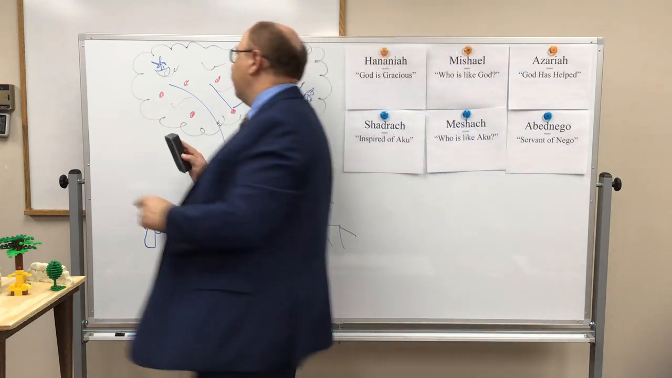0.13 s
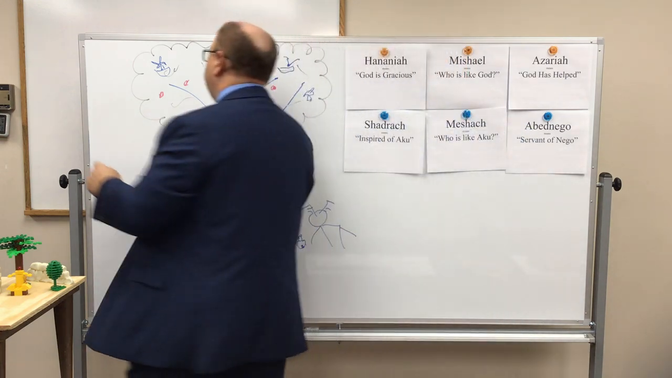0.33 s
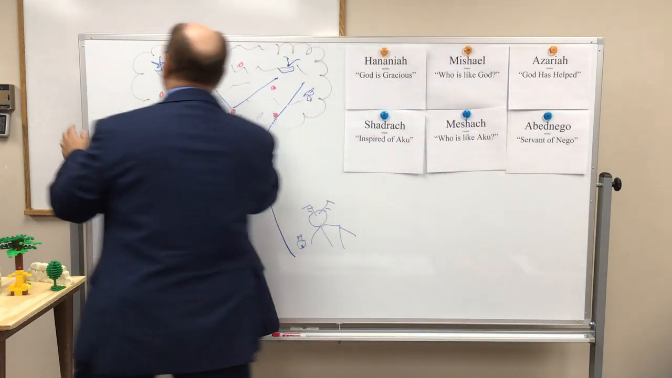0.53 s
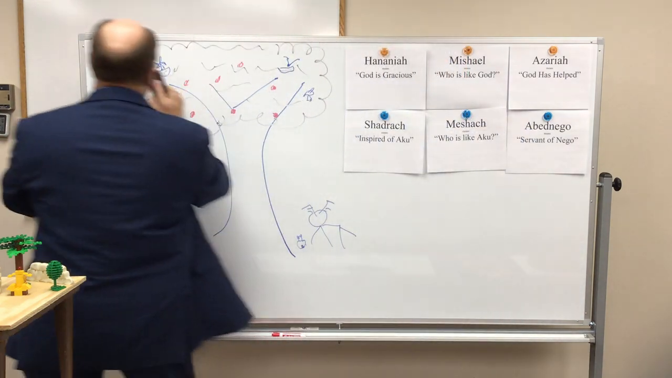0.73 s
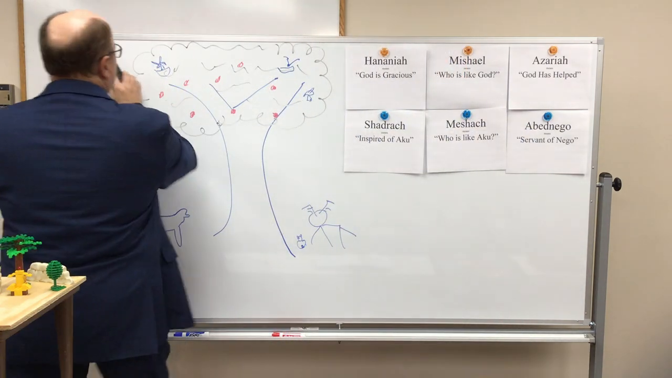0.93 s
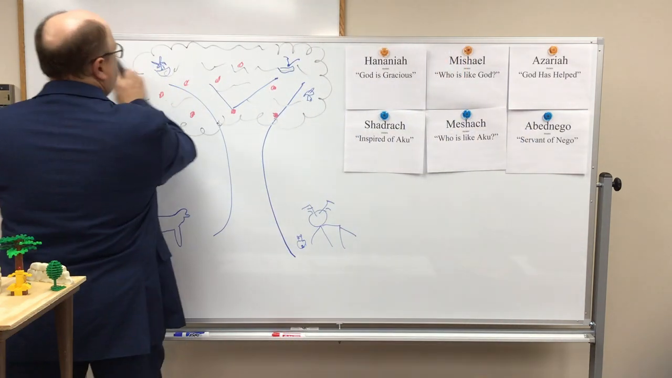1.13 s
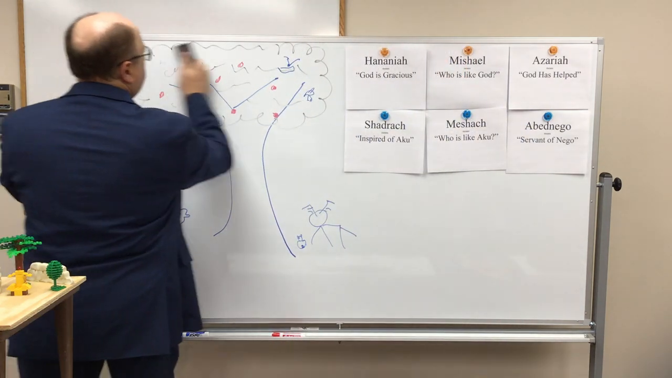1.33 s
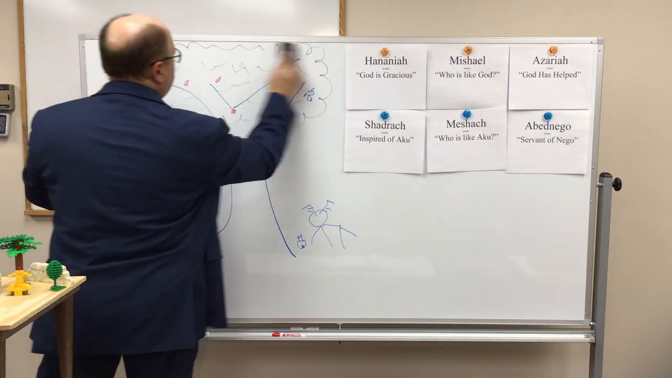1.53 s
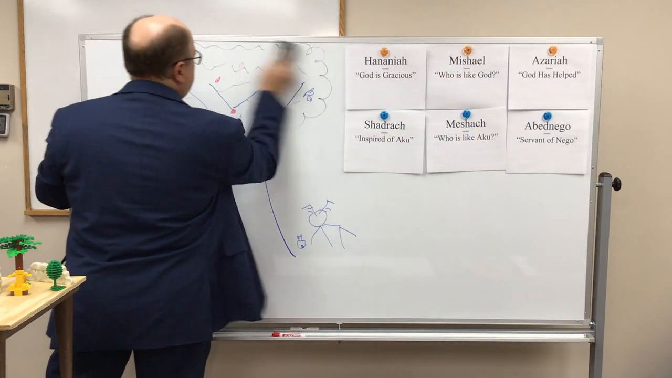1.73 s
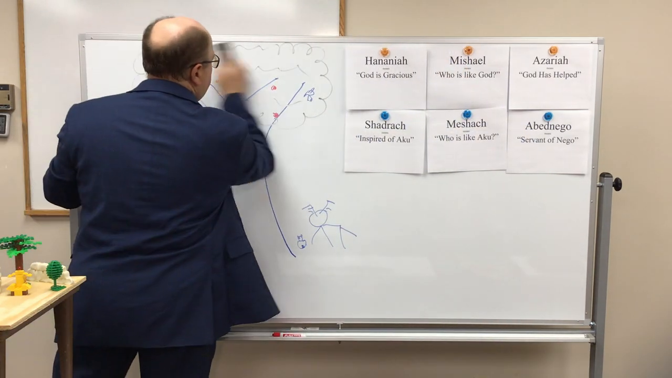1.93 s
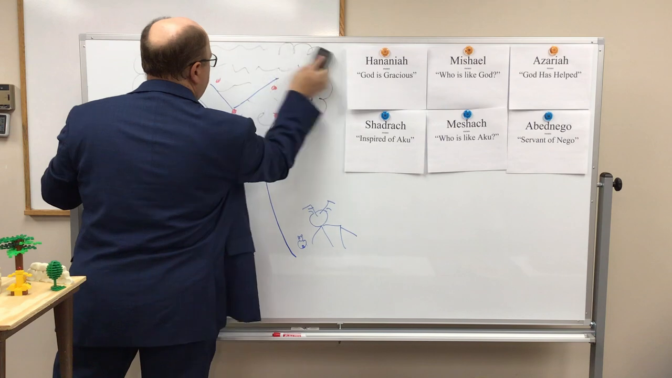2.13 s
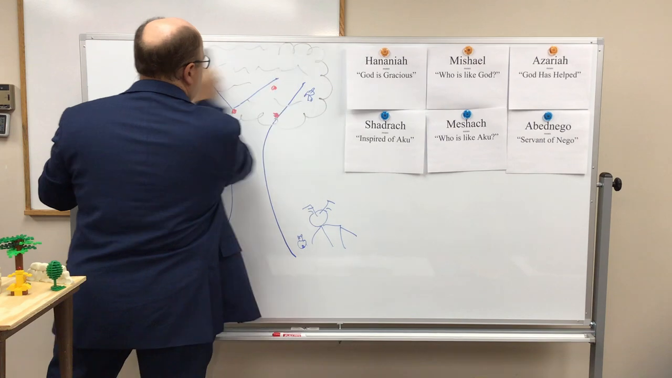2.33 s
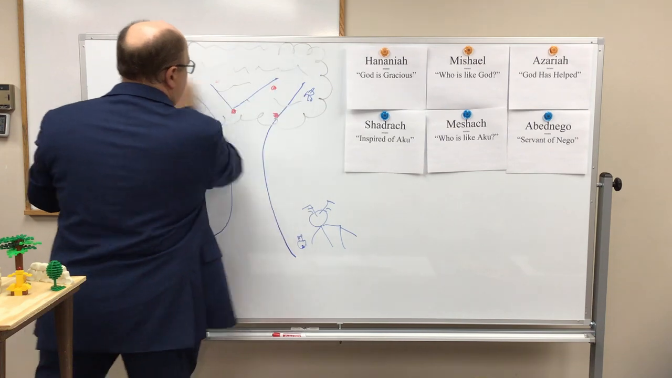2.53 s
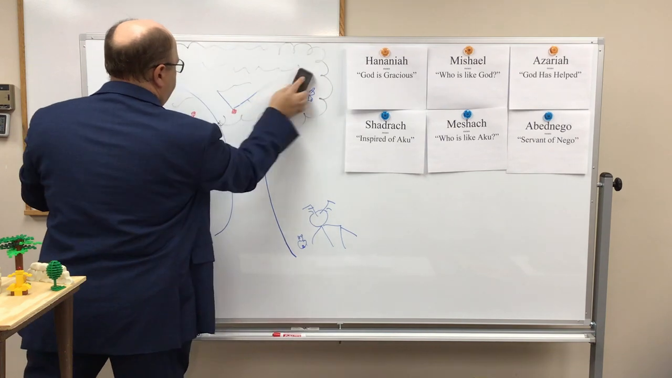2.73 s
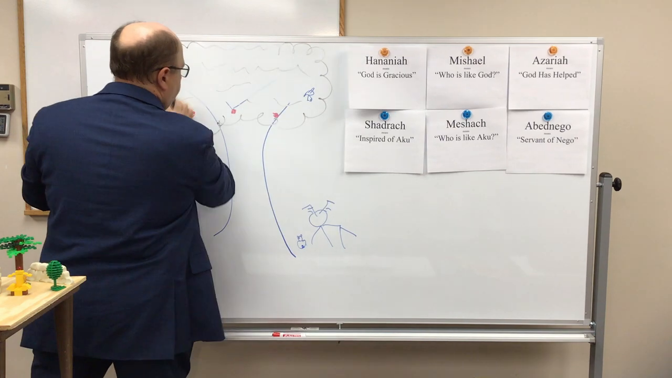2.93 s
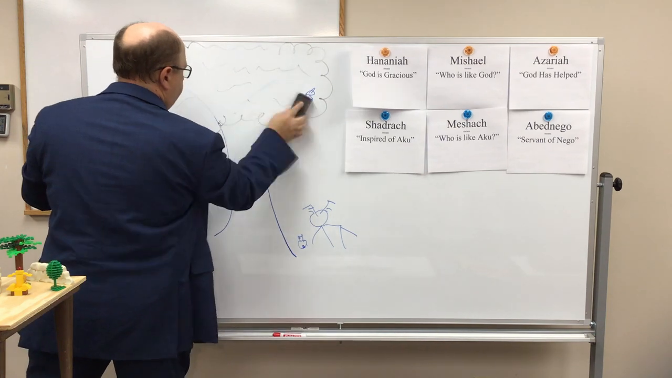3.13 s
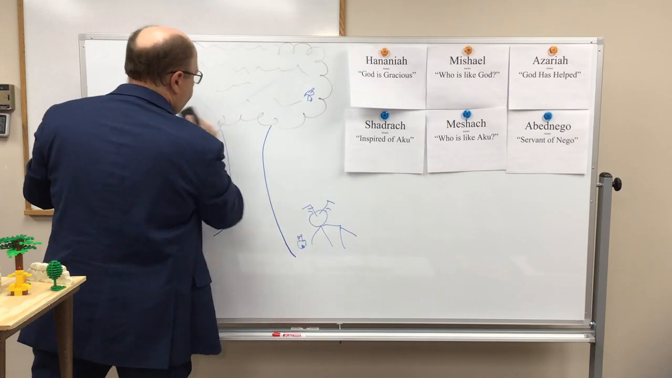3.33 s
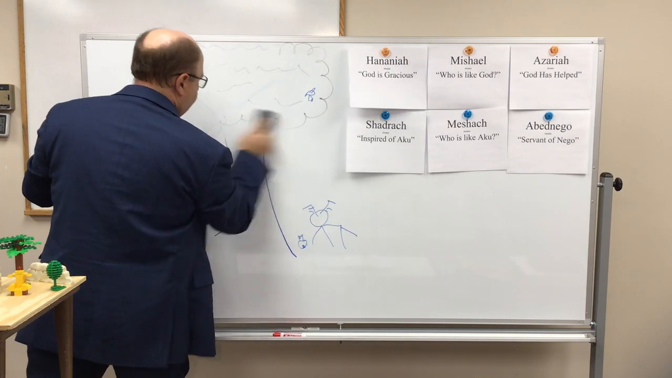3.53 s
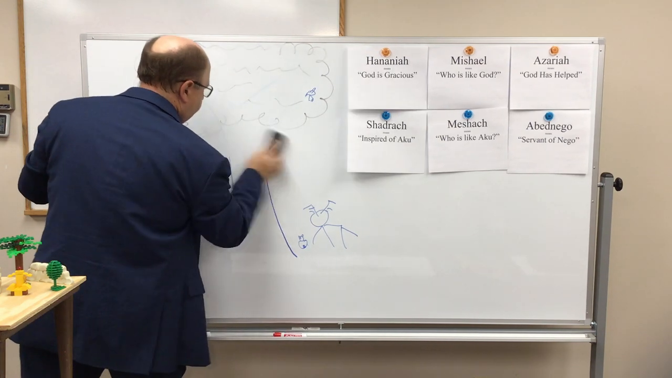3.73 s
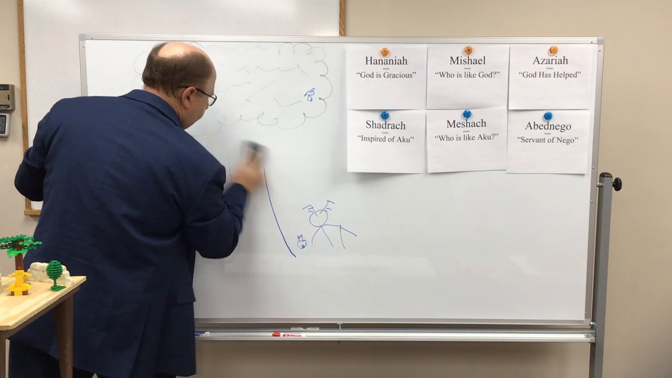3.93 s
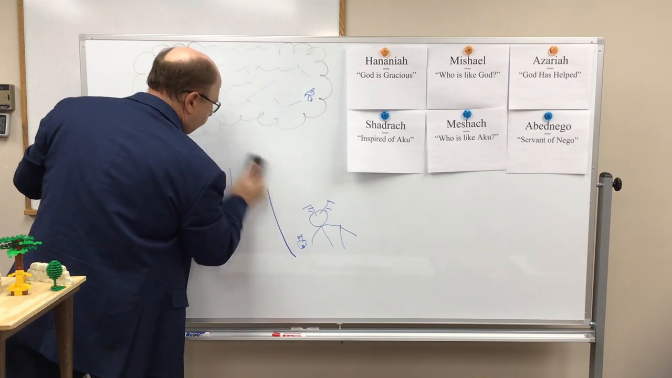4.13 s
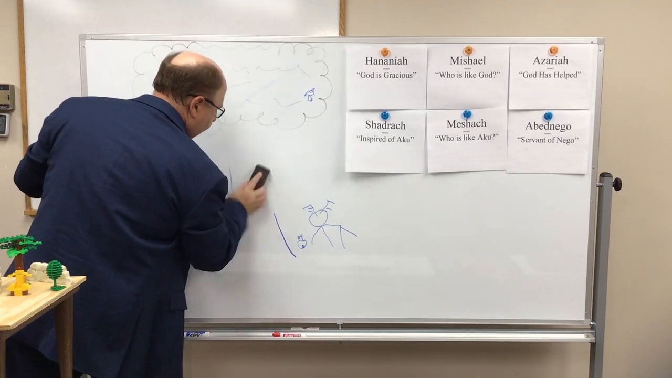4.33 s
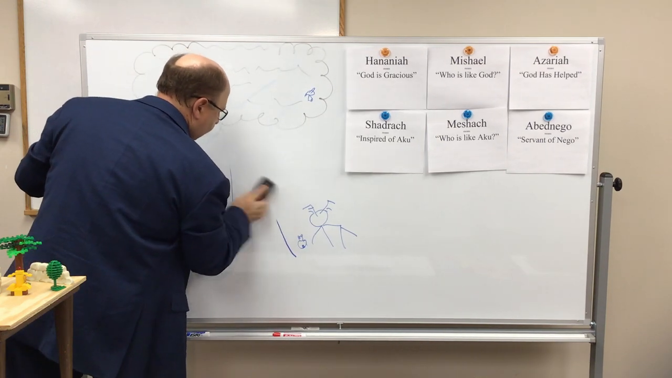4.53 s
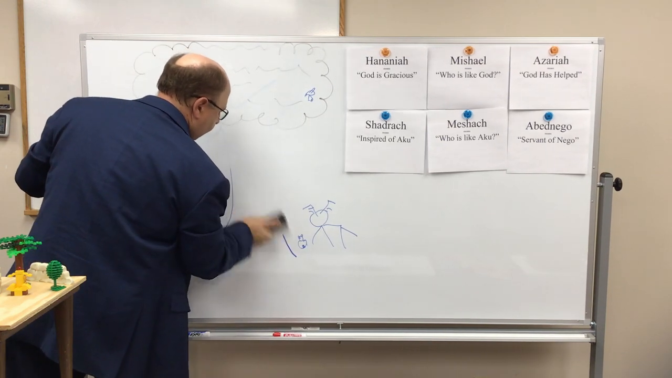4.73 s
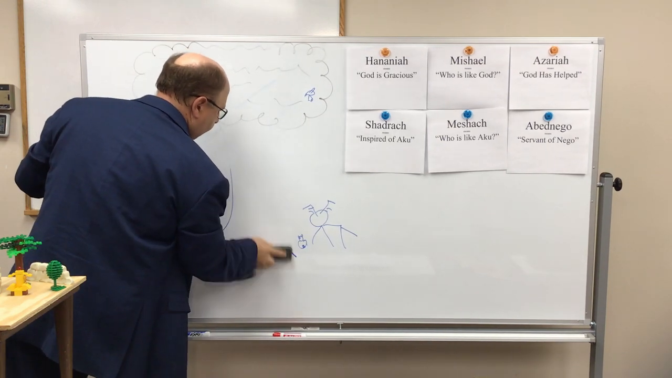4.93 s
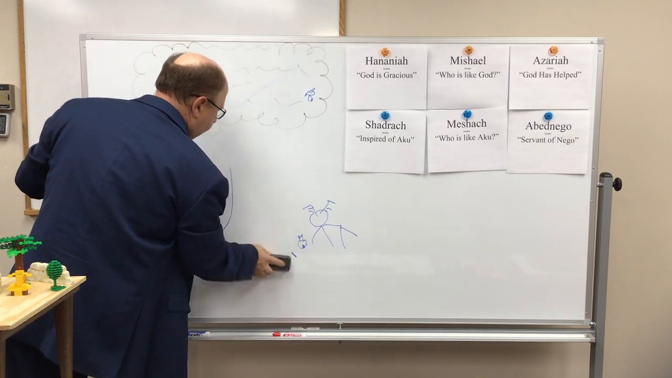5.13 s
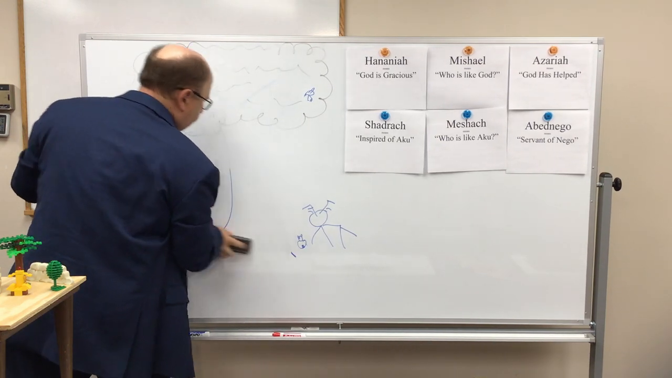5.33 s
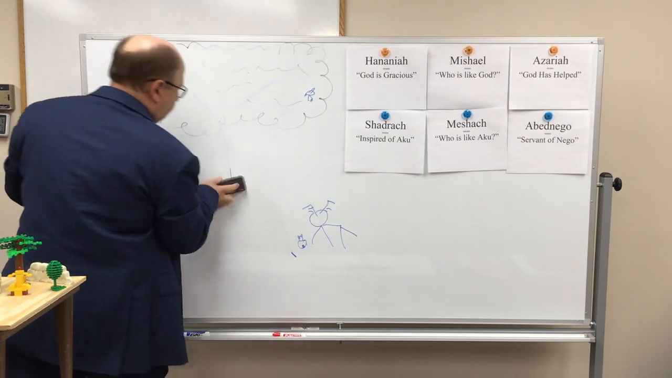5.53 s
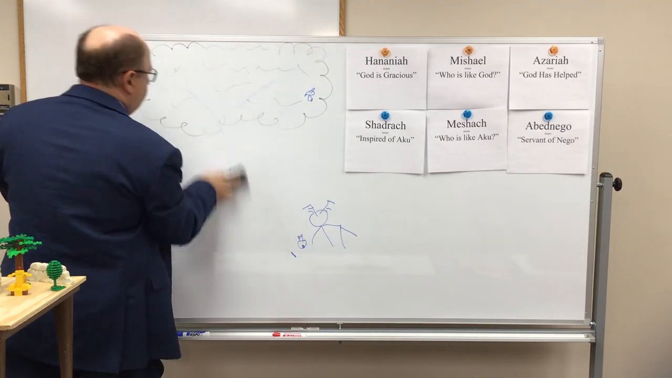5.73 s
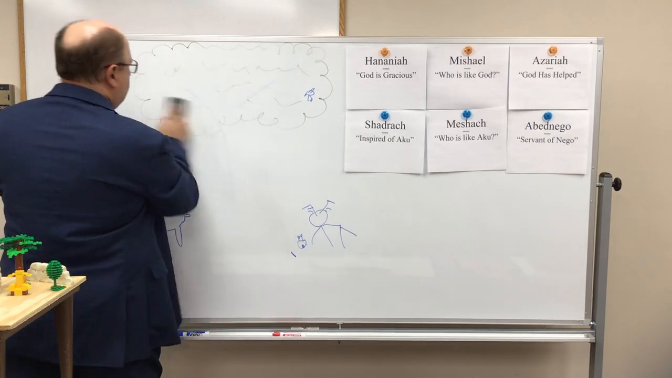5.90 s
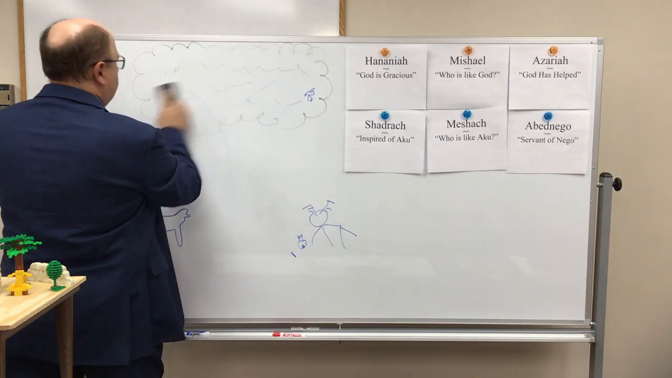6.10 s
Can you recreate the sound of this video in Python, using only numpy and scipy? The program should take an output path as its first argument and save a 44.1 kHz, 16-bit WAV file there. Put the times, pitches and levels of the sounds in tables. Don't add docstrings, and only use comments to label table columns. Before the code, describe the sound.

A felt eraser rubs a whiteboard in quick irregular strokes, soft hisses with dull panel thumps and hard scuffs, after a few footsteps in a quiet classroom.

```python
import sys
import numpy as np
from scipy import signal
from scipy.fft import rfft, irfft, next_fast_len
from scipy.io import wavfile
from scipy.ndimage import uniform_filter1d, map_coordinates

SR = 44100
rng = np.random.default_rng(int(sys.argv[2]) if len(sys.argv) > 2 else 0)


def attenuation_scalar(level_db):
    decades = np.asarray(level_db, float) / 20
    return 10 ** decades


def inscribe(sig):
    pcm = np.round(np.clip(np.atleast_2d(sig).T, -1, 1) * 32767)
    wavfile.write(sys.argv[1], SR, pcm.astype(np.int16))


N = 276242


def unit(x):
    return x / np.sqrt(np.mean(x ** 2) + 1e-20)


def along(points, hz):
    f, v = np.transpose(points)
    return np.interp(np.log(hz + 1), np.log(f + 1), v)


def curves(rows):
    s, *cols = np.transpose(rows)
    return [np.interp(np.arange(N) / SR, s, c) for c in cols]


def wobble(rate):
    knots = rng.standard_normal(int(N * rate / SR) + 4)
    return map_coordinates(knots, [np.arange(N) * rate / SR])


def filtered(x, response):
    m = next_fast_len(x.shape[-1] + 8192)
    spectrum = rfft(x, m) * response(np.fft.rfftfreq(m, 1 / SR))
    return irfft(spectrum, m)[..., :x.shape[-1]]


def rush(spectrum, patchy_db):
    z = signal.stft(rng.standard_normal(N + 512), nperseg=512)[2]
    field = uniform_filter1d(rng.standard_normal(z.shape), 8, axis=0)
    field = uniform_filter1d(field, 6, axis=1)
    x = signal.istft(z * attenuation_scalar(patchy_db * unit(field)), nperseg=512)[1][:N]
    return unit(filtered(x, lambda hz: attenuation_scalar(along(spectrum, hz))))


def ring(modes, t, scatter_db):
    hz, db, t60 = np.transpose(modes)[:, :, None]
    strength, detune = rng.standard_normal((2, len(modes), 1))
    sign = (-1.) ** np.arange(len(modes))[:, None]
    decay = attenuation_scalar(db + scatter_db * strength - 60 * t / t60)
    return np.sum(sign * decay * np.sin(2 * np.pi * hz * (1 + 0.01 * detune) * t), axis=0)


def muted(t, db):
    return attenuation_scalar(-db * np.clip((t - 0.0267) / 0.006 + .5, 0, 1))


def swell(t, press_s):
    return 1 - np.exp(-t / press_s)


def add(track, s, sound):
    part = track[round(s * SR):][:len(sound)]
    part += sound[:len(part)]


# frequency in Hz, level in dB per Hz.
AIR_SPECTRUM = [(20, -34), (60, 17.5), (120, 4.5), (300, 4), (600, -3), (1500, -7), (4000, -11.5),
                (8000, -36), (15500, -33)]


def air(db):
    return attenuation_scalar(db) * rush(AIR_SPECTRUM, patchy_db=0)


# frequency in Hz, t60 in seconds.
ROOM_DECAY = [(100, 0.15), (500, 0.42), (3000, 0.26), (10000, 0.037)]


def room(x):
    out = np.zeros(N)
    span = round(0.3 * SR)
    hz, t, z = signal.stft(rng.standard_normal((N // span + 1, SR // 3)), SR, nperseg=256)
    decay = attenuation_scalar(-60 * t / along(ROOM_DECAY, hz)[:, None])
    tails = signal.istft(z * decay, SR, nperseg=256)[1]
    for k, tail in enumerate(tails):
        piece = x[k * span:(k + 1) * span]
        add(out, k * span / SR + .009, signal.fftconvolve(piece, tail / np.linalg.norm(tail)))
    return out


# start in seconds, peak in dB, floor pitch in Hz, heel knock in relative dB,
# roll-on time in seconds.
FOOTSTEPS = [
    (0.005, -48.5, 151, 1, 0.015),
    (0.545, -51.5, 291, -2, 0.0045),
    (0.633, -30, 157, -3, 0.0072),
    (0.986, -32.5, 182, -35, 0.012),
]


def steps():
    out, t = np.zeros(N), np.arange(SR // 4) / SR
    for s, db, hz, knock_db, roll_s in FOOTSTEPS:
        push = ring([(hz, 0, .1), (1.45 * hz, -6, .07), (0.64 * hz, -8, .12)], t, 0)
        knock = ring([(327, 2.0, 0.044), (507, -2, 0.049), (440, -21, 0.04), (750, 3.0, 0.014)], t, 0)
        step = (push + attenuation_scalar(knock_db) * knock) * muted(t, 6) * swell(t, roll_s)
        add(out, s - .003, attenuation_scalar(db) * step)
    return out


# turn in seconds, hiss at the turn in dB, hiss at full speed in dB, share of the stroke before full
STROKES = [(0, -65, -67, 0.6), (.43, -70.5, -67, 0.7), (.6, -67.5, -65.5, 0.4), (.745, -68.5, -64.5, 0.6),
           (.955, -69.5, -62.5, 0.3), (1.19, -70.5, -59, 0.97), (1.69, -61.5, -61, .4),
           (1.745, -64, -56, 0.7), (1.975, -63.5, -56, 0.75), (2.1, -56.5, -57.5, 0.55),
           (2.22, -66, -54, 0.86), (2.355, -57, -53, 0.2), (2.57, -67.5, -54, 1), (2.71, -56, -54.5, 0.6),
           (2.835, -63.5, -56.5, 0.46), (3.05, -61.5, -54.5, 0.52), (3.245, -59, -57, 0.3),
           (3.425, -61, -54.5, 0.6), (3.587, -62.5, -57, 0.16), (3.72, -59.5, -56, 0.56),
           (3.895, -62, -59.5, 0.5), (3.98, -62, -56, 0.6), (4.1, -65, -60.5, 0.9), (4.2, -65.5, -58, 0.47),
           (4.33, -70, -62, 0.53), (4.43, -69, -59, 0.53), (4.555, -70.5, -62, 0.5),
           (4.66, -66.5, -59.5, 0.7), (4.805, -69, -61, 0.17), (4.91, -66.5, -60.5, 0.5),
           (5.03, -69, -61, 0.6), (5.13, -67, -61.5, 0.4), (5.26, -70.5, -60, 0.8),
           (5.49, -66, -62.5, 0.25), (5.62, -64, -62, 0.55), (5.765, -71.5, -59, 1),
           (5.9, -54.5, -54, 0.45), (6.11, -69, -57, 0.37)]
LAST_TURN_S = 6.36


def hand():
    turn, slow_db, full_db, share = np.transpose(STROKES)
    turn, slow_db = np.append(turn, LAST_TURN_S), np.append(slow_db, slow_db[-1])
    t = np.arange(N) / SR
    k = np.clip(np.searchsorted(turn, t, side="right") - 1, 0, len(share) - 1)
    done = np.clip((t - turn[k]) / np.diff(turn)[k], 0, 1)
    top = np.clip(share[k], .05, .95)
    rising = done < top
    reach = np.where(rising, done / top, (1 - done) / (1 - top))
    arch = np.sin(np.pi / 2 * reach) ** 0.68
    dip_db = (1 - arch) * (full_db[k] - slow_db[k + ~rising])
    smooth = lambda v: uniform_filter1d(v, size=SR // 100)
    return smooth(full_db[k] - dip_db), smooth(dip_db), smooth(done)


# frequency in Hz, level in dB, t60 in seconds.
DEEP_MODES = [(98.2, 2.5, 0.18), (124.4, 4.5, 0.16), (139.4, 4, 0.15), (161, -2, 0.2), (57.6, -9, 0.12)]
MAIN_MODES = [(238.4, -2.5, 0.16), (287.6, -8, 0.12), (256.5, 0.5, 0.17)]
UPPER_MODES = [(356.6, 1, 0.25), (381.6, -5, 0.28), (414.4, 1.5, 0.13), (460.7, 4.5, 0.12),
               (515.6, -4, 0.15), (660.6, -3.5, 0.12), (810, -8.5, 0.1), (738, -7, 0.1),
               (1056, -3.5, 0.044)]
# time in seconds, drone in dB.
WEIGHT = [(.8, -89), (1.3, -71), (1.9, -61.5), (2.35, -80), (2.71, -59), (2.84, -80), (3.05, -62),
          (3.15, -51), (3.4, -57), (3.65, -62), (3.84, -51), (4.33, -57.5), (5.26, -60.5), (5.54, -80),
          (5.68, -63), (5.87, -71), (5.96, -64), (6.26, -47)]


def drone():
    t = np.arange(SR // 2) / SR
    weight_db, = curves(WEIGHT)
    deep_db = -53 + 0.74 * (weight_db + 63.0)
    drag_db = 1.8 * wobble(30) - 0.74 * hand()[1]
    jerks = attenuation_scalar(drag_db) * rng.standard_normal((2, N))
    high = ring(MAIN_MODES, t, 0) + attenuation_scalar(-15) * ring(UPPER_MODES, t, 0)
    deep = ring(DEEP_MODES, t, 0)
    shake = lambda force, modes: signal.fftconvolve(force, modes / np.linalg.norm(modes))[:N]
    return shake(attenuation_scalar(weight_db + 1.0) * jerks[0], high) + shake(attenuation_scalar(deep_db) * jerks[1], deep)


# start in seconds, peak in dB, deep modes in relative dB,
# upper modes in relative dB, lean to the higher main mode in dB.
LANDINGS = [(1.189, -43.5, -8, -36, -1), (1.402, -48, -12, -17, 11), (1.438, -26.5, -8, -26.5, 1),
            (1.614, -42, -4.5, -20, 6), (1.8, -30.5, -6, -16.5, -1), (1.995, -36.5, -6, -18, -0.5),
            (2.236, -33.5, -4.5, -17.5, -4), (2.481, -38.5, -14, -11, 6), (2.67, -37, -0.5, -24, 5),
            (2.822, -39.5, -3.5, -16.5, 3), (3.072, -30, -4.5, -15, 3), (3.256, -27, -3.5, -20, -2),
            (3.404, -33, -4, -16.5, -1), (3.477, -21, -19, -21, 0), (3.667, -27.5, -5.5, -14, -0.5),
            (3.786, -32.5, -6, -13.5, 2), (3.877, -31.5, -38, -17.5, -5), (3.923, -34, -10, -10, -5),
            (4.182, -38, -27, -28, -7), (4.296, -40, -2, -13.5, -7), (4.413, -39.5, -8, -14, -4),
            (4.522, -37.5, -1.5, -13, -1), (4.741, -35, -7.5, -20, 1), (4.974, -41.5, 0, -14, 3.5),
            (5.197, -36, -7.5, -15.5, 3.5), (5.494, -34.5, -8.5, -18, 2.5), (5.571, -27.5, -17, -24.5, 1.5),
            (5.931, -23.5, -4.5, -16.5, -2.5), (6.035, -21.5, -12.5, -19, 8.5),
            (6.192, -39.5, 3, -10.5, -11)]
# start in seconds, peak in dB, deep modes in relative dB,
# lean in dB.
JUDDERS = [(1.138, -51, 3.5, -8), (1.162, -53, -3, -14), (1.232, -56.5, 4.5, 8), (1.385, -49, -26, -9),
           (1.73, -51.5, -10, -10), (1.777, -39.5, -9, 8), (2.207, -45.5, -4, -12), (2.28, -43.5, 1, -5),
           (2.305, -46, 3, 4), (2.64, -40.5, -7, -8), (2.694, -51, -1, -2), (2.89, -50, 3, 0),
           (3.12, -37.5, -1.5, -8), (3.204, -42, -11, 5), (3.238, -33.5, -7, -7), (3.311, -50, 7, -2),
           (3.442, -35, -9, -3), (3.503, -33.5, -10, 11.5), (3.566, -50, -2, -1), (3.6, -49, 4, 2),
           (3.71, -48, 4, -5), (3.749, -37, -14, 7), (4.041, -42.5, -28, 0), (4.107, -55, -9, -19),
           (4.209, -44.5, 5, 4), (4.331, -46, -2, 0), (4.397, -47, -8, 0), (4.633, -42, -20, 8),
           (4.778, -48, 1, -5), (4.835, -43, -10, 8), (5.093, -49.5, -5, 0), (5.342, -53.5, 5.5, 12),
           (5.525, -49, 2, 2), (5.61, -50.5, -3, -2), (5.643, -45.5, -23, -5), (5.74, -43.5, -12, -3),
           (5.778, -43.5, -17, 11), (5.911, -36, -27, 3), (5.992, -35.5, 0, 5), (5.955, -37, -2, 7),
           (6.016, -43, 0, 3), (6.07, -40, 1, 4), (6.105, -40, 1, 4), (6.166, -33, -17, 9),
           (6.215, -43, -4, 3)]
# time in seconds, lean to the higher deep modes in dB,
# focus on the middle deep mode in dB.
SPOT = [(1.1, 0, 2.5), (1.45, -1.5, 0), (1.798, -3, 0), (2.0, 1, -3), (2.25, -9, 2), (2.65, 2, 1.5),
        (2.85, -4, 0), (3.1, -1, 2.5), (3.26, 4, 9), (3.45, -3.5, -2.5), (3.7, -0.5, 2.5), (4.1, 1, -1),
        (4.5, -2.5, -0.5), (4.95, 8.5, 4.5), (5.2, 2, 0), (5.55, 2, 0), (5.95, -4, 3), (6.2, -2, 1.5)]
MAIN_LEAN = (-1, 1, 0)
DEEP_LEAN, DEEP_FOCUS = (-1, 0, 1, 1, -1), (-1, 1, -1, -1, 0)
JUDDER_UPPER_DB = -16.5


def thumps():
    out, t = np.zeros(N), np.arange(SR // 4) / SR
    when, *place = np.transpose(SPOT)
    judders = [(s, db, deep_db, JUDDER_UPPER_DB, lean_db) for s, db, deep_db, lean_db in JUDDERS]
    for s, db, deep_db, upper_db, lean_db in list(LANDINGS) + judders:
        press_s = 0.0042 + 0.00025 * (JUDDER_UPPER_DB - upper_db)
        main = [(hz, level + side * lean_db, t60)
                for (hz, level, t60), side in zip(MAIN_MODES, MAIN_LEAN)]
        body = ring(main, t, 0.29) * muted(t, 11)
        body = body + attenuation_scalar(upper_db) * ring(UPPER_MODES, t, 1.5)
        add(out, s - .003, attenuation_scalar(db - 1.0) * body * swell(t, press_s) ** 1.26)

        lean, focus = (np.interp(s, when, v) for v in place)
        bend = [(hz, level + a * lean + b * focus, t60)
                for (hz, level, t60), a, b in zip(DEEP_MODES, DEEP_LEAN, DEEP_FOCUS)]
        deep = ring(bend, t, 1.5) * muted(t - 0.024, 10)
        deep_start = s - .003 - 0.01104
        add(out, deep_start, attenuation_scalar(db + deep_db + 0.5) * deep * swell(t, 0.0081) ** 2)
    return out


# start in seconds, peak in dB, centre in Hz, t60 in seconds.
BACK_SCUFFS = [(0.377, -53, 3670, 0.055), (0.766, -47, 1970, 0.03), (0.9888, -49, 4060, 0.2),
               (1.7855, -44, 2060, 0.074), (2.4793, -32, 2860, 0.15), (2.8795, -35, 1850, 0.058),
               (3.103, -39.5, 3360, 0.12), (3.2962, -34, 1930, 0.11), (3.4532, -38, 2450, 0.28),
               (3.4885, -37, 2000, 0.17), (3.6349, -41.5, 2220, 0.065), (3.79, -33, 3350, 0.11),
               (3.915, -36, 3220, 0.12), (4.0655, -42, 3800, 0.053), (4.1732, -33.5, 1860, 0.15),
               (4.287, -40.5, 3730, 0.2), (4.3962, -44.5, 3800, 0.15), (5.568, -47, 2610, 0.25),
               (5.914, -37, 2900, 0.3), (5.9313, -34.5, 2100, 0.24), (5.994, -30, 3020, 0.1),
               (6.0362, -35.5, 2280, 0.19), (6.16, -39, 2980, 0.07)]
# start in seconds, peak in dB, centre in Hz, t60 in seconds.
EDGE_SCUFFS = [(0.779, -45, 5130, 0.18), (0.84, -50, 4270, 0.25), (2.1, -46, 4900, 0.35),
               (2.4798, -32, 3570, 0.19), (2.4795, -31, 4400, 0.2), (2.483, -38.5, 6150, .1),
               (2.881, -52, 1700, 0.097), (3.27, -43, 10360, .1), (3.276, -41, 6700, 0.1),
               (3.286, -39, 8000, 0.15), (3.296, -38.5, 5270, .14), (3.297, -41, 1750, 0.12),
               (3.4544, -45, 4540, .15), (3.63, -39, 2300, 0.062), (3.79, -45, 4050, .1),
               (4.067, -38.5, 4070, 0.087), (4.175, -42, 2100, 0.19), (4.397, -49, 4400, 0.17),
               (5.9144, -33.5, 4070, 0.17), (5.915, -45, 7500, .2), (5.92, -38, 3020, 0.071),
               (5.994, -39.5, 7560, 0.098), (5.996, -46, 10500, 0.089), (6.008, -37, 3130, 0.08),
               (6.168, -39.5, 3620, 0.05)]
# start in seconds, peak in dB, centre in Hz.
HOLLOW_KNOCKS = [(1.782, -43, 732), (2.25, -44.5, 900), (2.3, -46, 675), (2.478, -29, 940),
                 (2.64, -42.5, 850), (3.235, -41, 890), (3.473, -35.5, 815), (3.669, -42, 646),
                 (3.78, -35.5, 644), (3.914, -38, 674), (4.05, -41, 750), (4.398, -45, 750),
                 (4.516, -48, 800), (4.633, -48, 850), (5.197, -54, 700), (5.55, -55, 850),
                 (5.571, -46.5, 684), (5.6, -45, 700), (5.68, -52, 700), (5.74, -60, 700),
                 (5.907, -33.5, 1090), (5.932, -28.5, 900), (5.945, -32.5, 750), (5.994, -35, 660),
                 (6.03, -27, 920), (6.166, -41, 792)]
# start in seconds, peak in dB, centre in Hz.
SHELL_SCUFFS = [(2.4816, -32.5, 1750), (3.297, -42.5, 3400), (3.7875, -38.5, 1670), (3.9169, -41, 1660),
                (4.0677, -41, 2460), (4.1715, -43, 1460), (4.2884, -39.5, 2300), (4.3966, -45, 2240),
                (4.524, -50, 1970), (5.9145, -38.5, 1860), (5.9953, -33, 1710)]
# start in seconds, peak in dB, centre in Hz.
HARD_TICKS = [(0.633, -44, 800), (0.778, -40.5, 5200), (2.479, -34, 2500), (2.879, -44, 2000),
              (3.295, -42, 3000), (3.452, -44, 4000), (3.788, -46, 3470), (3.915, -47, 2500),
              (4.067, -42, 3500), (4.171, -39, 2000), (4.289, -48, 3000), (4.396, -51, 4070),
              (5.907, -45, 1100), (5.914, -35, 3800), (5.994, -31, 8500), (6.03, -30, 1050),
              (6.036, -38, 1300), (6.164, -48, 3000)]
# frequency in Hz, width in Hz, boost in dB.
FRAME_MODES = [(665, 40, 6), (780, 70, 4), (1050, 90, 3), (1645, 60, 7), (2200, 130, 5), (2870, 60, 3),
               (3060, 90, 5), (3510, 90, 5), (3750, 60, 3), (4020, 60, 3), (4450, 70, 6), (5220, 140, 4),
               (5920, 140, 4), (6780, 150, 3)]


def scuffs():
    out, t = np.zeros(N), np.arange(SR // 4) / SR
    drag_s, tick_s = 0.01, 0.002
    contacts = [(s, db, hz, 0.54, t60, drag_s) for s, db, hz, t60 in BACK_SCUFFS]
    contacts += [(s, db, hz, 0.17, t60, drag_s) for s, db, hz, t60 in EDGE_SCUFFS]
    contacts += [(*row, 0.67, 0.083, drag_s) for row in HOLLOW_KNOCKS]
    contacts += [(*row, 0.56, 0.16, drag_s) for row in SHELL_SCUFFS]
    contacts += [(*row, 0.6, 0.023, tick_s) for row in HARD_TICKS]
    for s, db, hz, octaves, t60, hold in contacts:
        band = lambda f: np.exp(-.5 * (np.log2((f + 1) / hz) / octaves) ** 2)
        rough = np.repeat(rng.standard_normal(len(t) // 64 + 1), 64)[:len(t)]
        grit = rng.standard_normal(len(t)) * attenuation_scalar(2.4 * rough)
        fade = attenuation_scalar(db - 13.0 - 60 * np.maximum(t - hold, 0) / t60)
        add(out, s - .001, fade * swell(t, hold / 8) * unit(filtered(grit, band)))
    rings = lambda f: 1 + sum((attenuation_scalar(db) - 1) * 1j * f * w / (c * c - f * f + 1j * f * w)
                              for c, w, db in FRAME_MODES)
    return attenuation_scalar(-2.5) * filtered(out, rings)


# frequency in Hz,
# level in dB per Hz.
FINE_HISS = [(1500, -26), (3000, -6), (5000, -3), (8000, -2), (12000, -5), (15500, -9)]
SLOW_SCRAPE = [(300, -10), (700, -0.5), (1400, -2.5), (2300, 1), (3200, -9), (5000, -7.5), (8000, -28)]
FAST_SCRAPE = [(500, -51), (1500, -15.5), (3000, -7), (4400, -6.5), (5600, -10.5), (7000, -26), (9000, -31)]
SHEEN = [(7000, -34), (11000, 1), (13500, -2), (15500, -8)]
# time in seconds, scrape over hiss in dB, scrape colour from 0 to 1.
INK = [(0, 3, 0.35), (.8, 6, 0.33), (1.2, 2, 0.4), (1.4, 3.5, 0.6), (1.7, 3.5, 0.7), (1.9, -0.5, 0.43),
       (2.3, 0, 0.7), (2.7, 2, 0.74), (3.0, 2.5, 0.71), (3.3, 3, 0.52), (3.8, 4, 0.6), (4.4, 0.5, 0.82),
       (4.6, 1.5, 0.52), (5.1, -3, 0.56), (5.35, 1, 0.62), (5.7, 3, 0.42), (6.0, 3, 0.54),
       (6.26, 3.5, 0.45)]
# time in seconds, top of the hiss in dB.
GLOSS = [(0, 0), (.7, -3), (1.1, -5), (1.5, 4), (1.9, -4), (2.15, 3), (2.3, 0), (2.7, -10), (3.0, 3),
         (3.3, -4), (3.7, -1), (4.1, 5), (4.6, 6), (5.1, -1), (5.5, 3), (5.8, 8), (5.98, -1), (6.2, -1)]


def felt():
    hiss_db, dip_db, done = hand()
    ink_db, colour = curves(INK)
    blend = np.clip(colour + 0.14 * (done - .5), 0, 1) * np.pi / 2
    scrape = np.cos(blend) * rush(SLOW_SCRAPE, patchy_db=1.5)
    scrape = scrape + np.sin(blend) * rush(FAST_SCRAPE, patchy_db=1.5)
    scrape_db = ink_db + 0.053 * dip_db - 3.0
    sheen_db = -8 + curves(GLOSS)[0] + 0.7 * (hiss_db - hiss_db.max())
    sheen = attenuation_scalar(sheen_db) * rush(SHEEN, patchy_db=-6)
    flutter_db = 0.45 * wobble(40)
    return attenuation_scalar(hiss_db + flutter_db) * (rush(FINE_HISS, patchy_db=1.0) + sheen + attenuation_scalar(scrape_db) * scrape)


# frequency in Hz, side minus mid in dB.
SPREAD = [(40, -22), (180, -27), (310, -20), (550, -15), (1650, -15), (3700, -16.5), (8640, 0.5),
          (15000, -7.5)]


def scene():
    hits, rub = scuffs(), felt()
    low = thumps() + drone() + steps()
    mid = low + hits + rub + air(-60.0)
    mid = mid + attenuation_scalar(-9.0) * room(low) + attenuation_scalar(-9.0) * room(hits) + attenuation_scalar(-15.0) * room(rub)
    diffuse = room(low + hits + rub) + air(-49.5)
    side = filtered(diffuse, lambda hz: attenuation_scalar(along(SPREAD, hz) - 6.5))
    side = attenuation_scalar(3 * wobble(8)) * side
    mids = lambda hz: 0.089 * np.exp(-.5 * (np.log2((hz + 1) / 1500) / 1.1) ** 2)
    lean = filtered(mid, mids)
    return np.array([mid + side - lean, mid - side + lean])


def roll_off(x):
    return signal.sosfilt(signal.butter(12, 15730, fs=SR, output="sos"), x)


def record(dry):
    cut = filtered(dry, lambda hz: (1j * hz / (75 + 1j * hz)) ** 3 * (hz < 15740))
    rumble = attenuation_scalar(-86) * rush([(15, -36), (40, 8), (70, -6), (120, -29), (200, -62)], patchy_db=0)
    return roll_off(cut + rumble)


dry = scene()
out = record(dry)
inscribe(out)
```